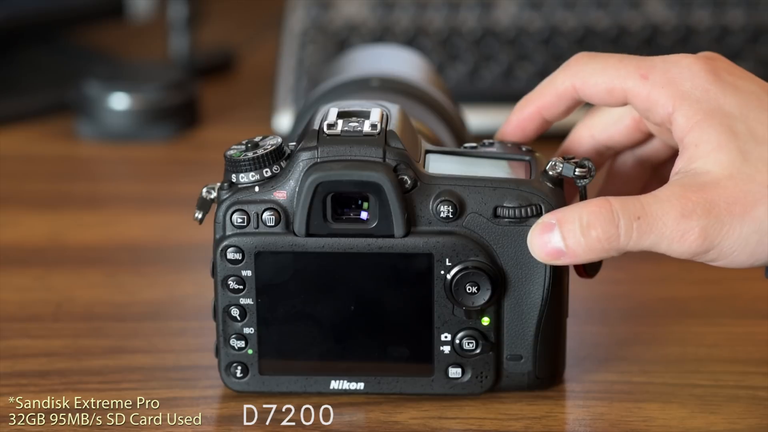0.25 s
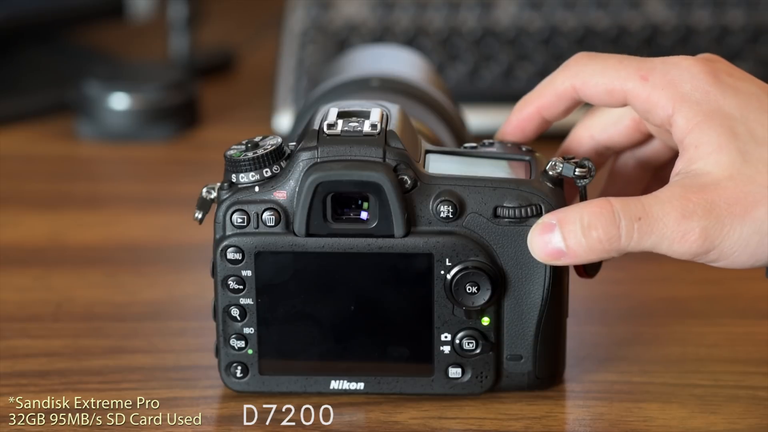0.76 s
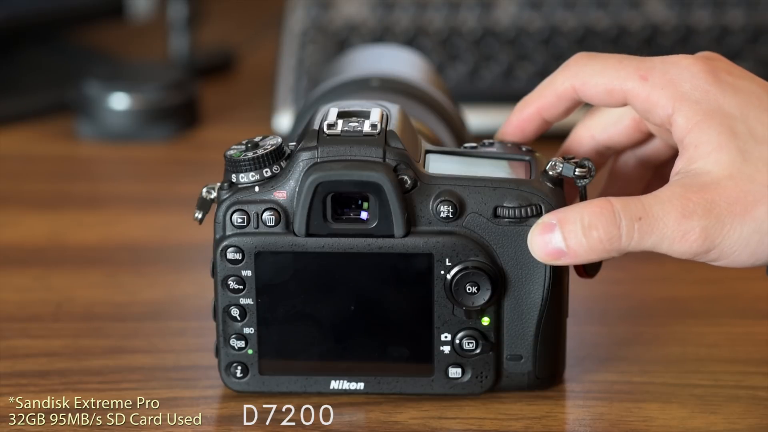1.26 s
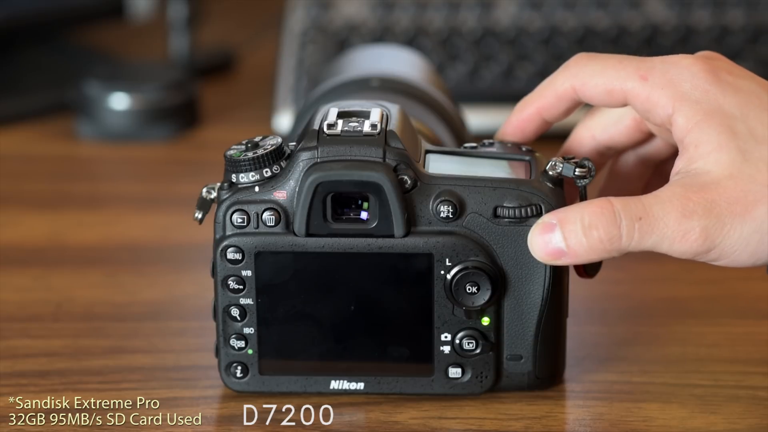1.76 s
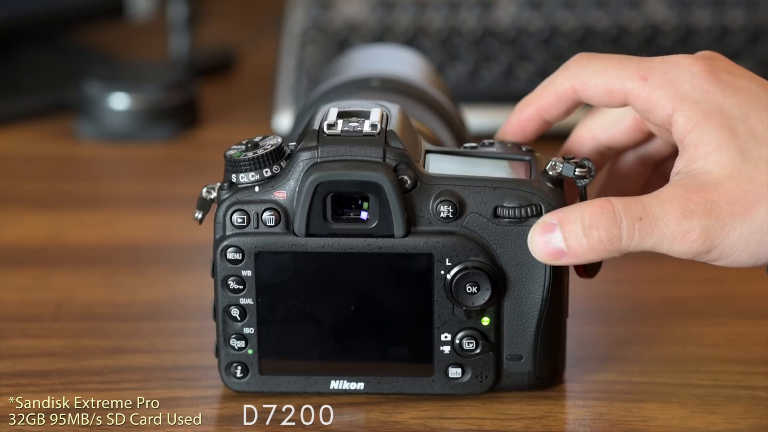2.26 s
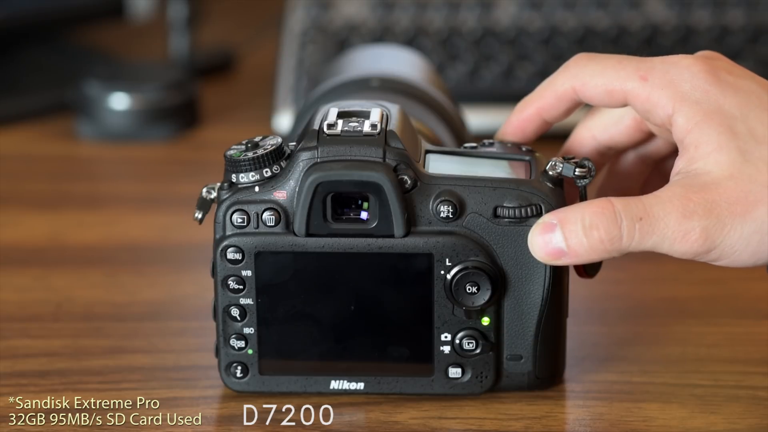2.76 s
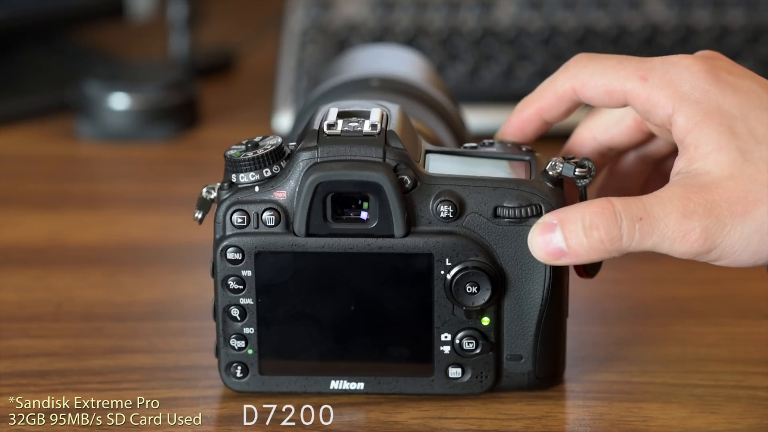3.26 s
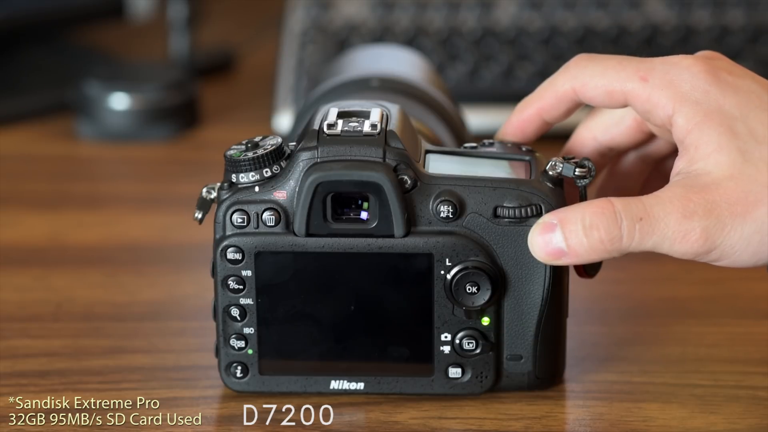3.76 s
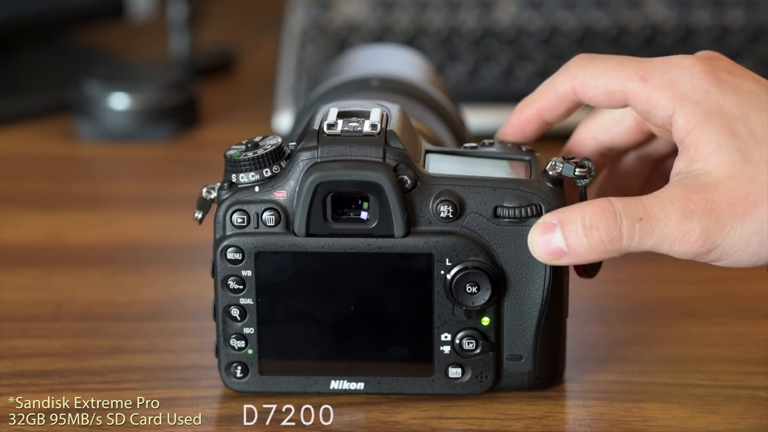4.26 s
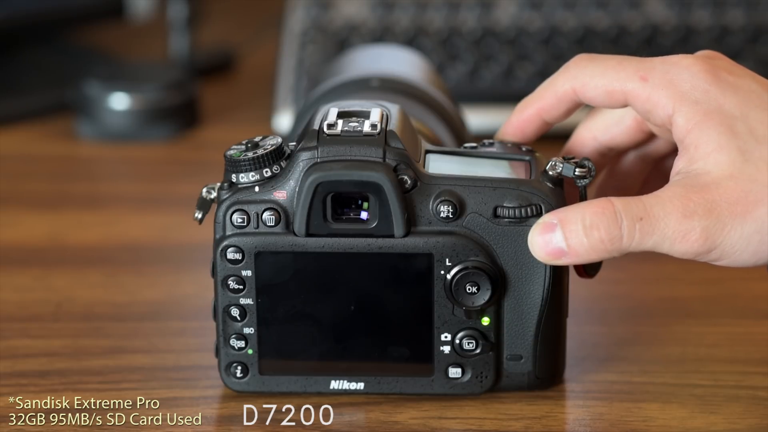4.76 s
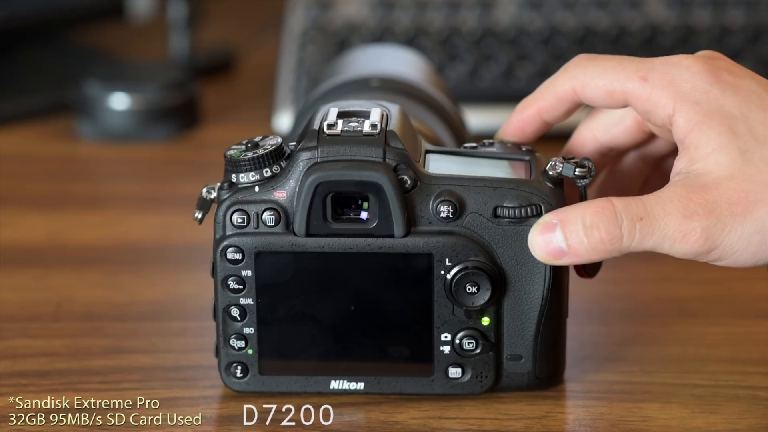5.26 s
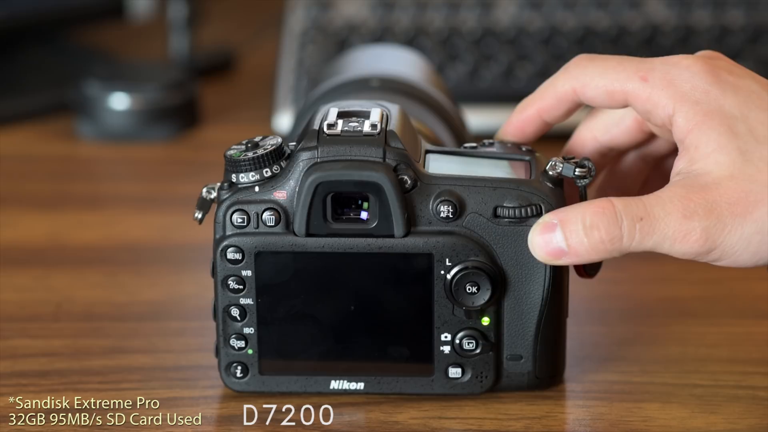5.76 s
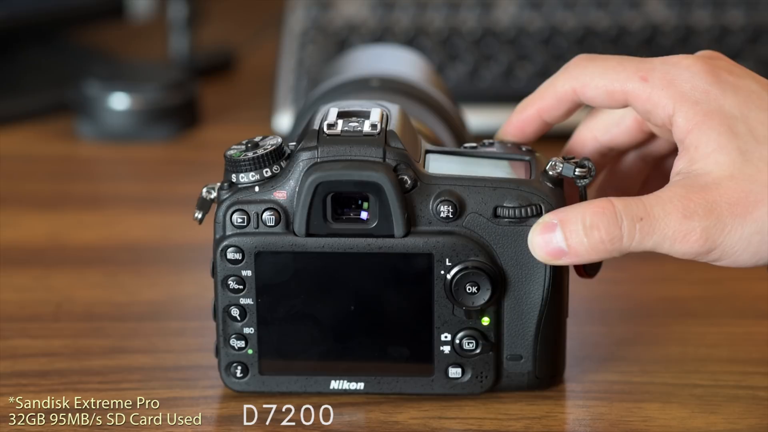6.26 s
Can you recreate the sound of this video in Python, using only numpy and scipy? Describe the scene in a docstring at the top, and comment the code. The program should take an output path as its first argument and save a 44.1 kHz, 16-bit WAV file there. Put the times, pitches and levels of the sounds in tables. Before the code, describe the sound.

A camera shutter fires a rapid, even burst of crisp clicks, then slows and stumbles, close up in a quiet room.

```python
"""A small quiet room, a reflex camera on a wooden desk, the microphone close by.
The camera is already shooting six frames a second, then stumbles as its buffer fills. Every frame is
one chain of clicks and whirrs: release, aperture lever, mirror up, shutter curtains, cocking gears,
mirror down, latch. The blows thump the desk and leave springs ringing; the room answers briefly."""
import sys
import numpy as np
from scipy import signal
from scipy.fft import rfft, irfft, next_fast_len
from scipy.io import wavfile
from scipy.ndimage import uniform_filter1d

SR = 44100
rng = np.random.default_rng(int(sys.argv[2]) if len(sys.argv) > 2 else 0)


def dump(signal):
    """Clip the signal to [-1, 1] and save it as 16-bit WAV at the path in sys.argv[1]."""
    limited = np.clip(np.atleast_2d(signal).T, -1, 1)
    pcm = np.round(limited * 32767).astype(np.int16)
    wavfile.write(sys.argv[1], SR, pcm)


N = 286650

# room tone spectrum: f/Hz, relative level/dB
ROOM_TONE = [(25, 13.5), (50, 7.5), (70, 4), (110, 10.5), (200, 12), (400, -4.5), (1000, -13.5),
             (4000, -28.5), (16000, -41)]
# reverberation time: f/Hz, t60/s
ROOM_T60 = [(150, 0.63), (600, 0.13), (2000, 0.15), (5000, 0.16), (10000, 0.135), (16000, .15)]
# reverberation against the direct sound at the microphone: f/Hz, level/dB
REVERB_LEVELS = [(150, -17), (600, -8), (1400, -12), (3000, -17), (6000, -20), (14000, -20)]
# microphone bass roll-off: f/Hz, level/dB
MIC_LOW_CUT = [(50, -28.5), (62, -28.5), (79, -18), (100, -5), (130, 0)]
# lingering rings of the desk top and the room: f/Hz, level/dB, t60/s
DESK_MODES = [(94, -43.5, 0.4), (128, -54, 0.4), (163.2, -52, 1), (221.4, -55, 0.7), (305, -50.5, 0.17),
              (345, -68.5, 0.28)]
# blows reaching the desk: t/s in the frame, level/dB, f/Hz, swell/s, share of the curtain level added
DESK_THUMPS = [(.017, -37.5, 178, 0.0043, 0), (0.0306, -31.3, 266, 0.0034, 0.12),
               (0.034, -36, 148, 0.0046, 0.07), (.0515, -28, 230, 0.0033, .85),
               (0.0518, -33, 140, 0.0075, 0.6), (.066, -34.3, 220, 0.0032, 0.08),
               (.083, -31, 200, 0.0028, 0.1), (.0945, -38, 175, 0.0036, 0),
               (.11, -44.5, 159.6, 0.0044, 0.03)]
# ringing springs: f/Hz, level/dB, t60/s
SPRING_MODES = [(1830, -72, .35), (1880, -76.5, 0.29), (2148, -65, 0.6), (2080, -60, .12), (2907, -76, .35),
                (4344, -81.5, .4)]
# resonances of each moving part: f/Hz, width/Hz, relative level/dB
RELEASE_MODES = [(403, 150.0, -54), (845, 130, -7), (1060, 230, -7.5), (1980, 210, -18), (2306, 50, 6),
                 (2930, 450, 1.5), (3002, 5800, -12.5), (3940, 67, 0), (6300, 2700, -7), (8800, 410, -9)]
LEVER_MODES = [(403, 150.0, -28), (574, 99, -14), (920, 280, -10.5), (1420, 180, -6), (1890, 55, -2),
               (3000, 4000, -9), (2970, 480, -4.5), (3495, 270, -0.5), (6270, 2300, -14), (9640, 570, -15)]
MIRROR_UP_MODES = [(640, 290.0, -17), (1170, 243, -8), (1330, 130, -4), (1360, 450, -20),
                   (1769, 950, -13.5), (1956, 160, -10.5), (2880, 1100, -13), (3320, 570, -1.5),
                   (3714, 430, -0.5), (4870, 99, -6), (5800, 4100, -15.5), (5888, 220.0, -10),
                   (10400, 1500, -23.5)]
CURTAIN_MODES = [(460, 440, -15.5), (905, 120, -5), (1330, 320, -1), (1730, 230, -2.5), (2080, 270, -5),
                 (2276, 150.0, -23.5), (2610, 200, -5), (3170, 380, -4), (3885, 160, -12.5),
                 (4410, 260, -5), (5050, 380, -2.5), (5420, 310, -5.5), (6000, 660, -16), (6540, 930, -8),
                 (8800, 2900.0, -12.5), (13926, 3100, -23.5)]
GEAR_MODES = [(500, 120, -18), (595, 130, -14.5), (760, 150.0, -17), (885, 150, -10.5),
              (1190, 310.0, -10.5), (1467, 93, -3), (1913, 480, -2.7), (2728, 4400, -10), (3520, 2200, -3),
              (5721, 2500, -12)]
MIRROR_DOWN_MODES = [(440, 470, -18.5), (840, 260, -4.5), (1290, 520, -6.5), (1670, 110, -8),
                     (2070, 450, -10.5), (2218, 130, 0.5), (2957, 540, -0.5), (3480, 86, -4.5),
                     (3830, 1600, -7.5), (4424, 4950, -11), (6720, 1500, -9), (9071, 460.0, -24.5),
                     (10570, 2700, -17.5)]
LATCH_MODES = [(503, 820.0, -17), (940, 150.0, -26), (1043, 120, 0), (1168, 110, -3), (1455, 350, -2),
               (1980, 380, -3), (3400, 1400, -5), (3730, 63, -13.5), (4940, 4400, -15),
               (7439, 880.0, -19.5)]
# contacts and rebounds: t/s from the frame's start, level/dB, decay/s
RELEASE_HITS = [(-.002, -46.5, 0.0033), (.0005, -26.5, 0.0006), (.0016, -32, 0.0011), (.0035, -41, 0.0033)]
LEVER_HITS = [(.0067, -29, .0011), (.0084, -29.5, .0012), (0.0108, -35, .0015)]
CURTAIN_HITS = [(0.0502, -22, .0007), (.0511, -19.3, 0.0009), (0.0527, -23, 0.001), (0.0538, -28.5, 0.0009)]
GEAR_HITS = [(0.046, -40, 0.0025), (0.0607, -35.5, 0.0012), (0.0631, -35.5, .001), (0.0713, -28.5, .0008),
             (0.0821, -34.5, 0.0009)]
# contacts and rebounds: t/s from the mirror's landing, level/dB, decay/s
MIRROR_UP_HITS = [(-.0025, -28, 0.0023), (-.0006, -22, .0014), (.0006, -20.7, .0017)]
MIRROR_DOWN_HITS = [(0, -23, 0.0009), (.0026, -23.5, .0011), (.0038, -23.5, .0017), (.0062, -35, 0.0022)]
LATCH_HITS = [(0.0142, -31.5, 0.0016), (0.0162, -32, 0.003)]
# rubbing strokes in a frame: start t/s, attack/s, level/dB, slope/(dB/s), end t/s, decay/s
LEVER_SLIDE = (0.003, 0.002, -37, -170, 0.043, 0.003)
GEAR_WHIRR = (0.052, 0.003, -37.5, 75, 0.084, 0.007)
# uneven frames once the buffer is full: t/s
LATE_STARTS = [4.7483, 4.9591, 5.2631, 5.4727, 5.6833, 5.9871, 6.2904, 6.4506]
# the curtain slams on about every third frame: frame number from 0
SLAM_FRAMES = [2, 7, 8, 10, 13, 16, 19, 21, 24, 26, 30, 33, 36]
# the mirror catches the springs squarely: frame number from 0
SINGING_FRAMES = [2, 20, 21, 22, 25, 26, 28, 29, 34]

LEAD = SR // 2  # samples ahead of time zero, where the burst begins
FRAME_T = np.arange(-512, 5632) / SR  # t/s around one frame


def gain_of(db):
    """Decibels to amplitude."""
    return 10 ** (np.asarray(db) / 20)


def unit_rms(x):
    """Scales to an rms of one."""
    return x / np.sqrt(np.mean(abs(x) ** 2) + 1e-20)


def curve_at(points, hz):
    """Reads a table along a log-frequency axis."""
    f, value = np.transpose(points)
    return np.interp(np.log(hz + 1), np.log(f), value)


def add(mix, s, sound):
    """Mixes a sound in at time s; the mix begins LEAD samples early."""
    span = mix[LEAD + round(s * SR):][:len(sound)]
    span += sound[:len(span)]


def frame_levels(chosen, chosen_db, usual_db, spread_db):
    """One level for the chosen frames, another for the rest, both a little uneven."""
    return np.where(chosen, chosen_db, usual_db) + spread_db * rng.standard_normal(len(chosen))


def resonate(force, modes, size=4096):
    """A part colours the force on it: broad minimum-phase resonances with unit power gain."""
    f = np.maximum(abs(np.fft.fftfreq(size, 1 / SR)), 1)
    power = sum(gain_of(db) ** 2 / (1 + ((f * f - hz * hz) / (f * width)) ** 2) ** 2
                for hz, width, db in modes)
    log_gain = np.log(np.maximum(unit_rms(np.sqrt(power)), 1e-5))
    response = np.fft.ifft(np.exp(np.conj(signal.hilbert(log_gain)))).real
    return signal.oaconvolve(force, response[:size // 2])[:len(force)]


def ring(blows, modes):
    """Each blow sets off decaying sines."""
    t = np.arange(SR) / SR
    tone = sum(gain_of(db) * 1000 ** (-t / t60) * np.sin(2 * np.pi * hz * t) for hz, db, t60 in modes)
    return signal.oaconvolve(blows, tone)[:len(blows)]


def chatter(envelope, passes=10):
    """Random micro-impacts under an envelope, evenly spread over all frequencies."""
    grains = rng.standard_normal(len(envelope))
    for _ in range(passes):
        white = irfft(np.exp(1j * np.angle(rfft(grains * envelope))))
        grains = white / np.sqrt(abs(uniform_filter1d(white ** 2, size=40)) + 1e-20)
    return grains * envelope


def strike(times, hits, modes, fresh, levels_db=0, rise_s=0.0003):
    """A part hits and rebounds alike in every frame, but for a fresh share of its chatter's power."""
    power = 0
    for s, db, decay in hits:
        age = np.maximum(FRAME_T - s + rise_s, 0)
        power += (gain_of(db) * np.minimum(age / rise_s, np.exp((rise_s - age) / decay))) ** 2
    envelope = np.sqrt(power)
    repeated = np.sqrt(1 - fresh) * chatter(envelope)
    force = np.zeros(LEAD + N)
    for s, db in zip(times, np.broadcast_to(levels_db, len(times))):
        varying = np.sqrt(fresh) * envelope * rng.standard_normal(len(envelope))
        add(force, s + FRAME_T[0], gain_of(db) * (repeated + varying))
    return resonate(force, modes)


def rub(times, stroke, modes, grain_db):
    """Teeth and sliding faces give a grainy rush: attack, sloping hold, decay."""
    begin, attack, db, slope, end, decay = stroke
    envelope = np.clip((FRAME_T - begin) / attack, 0, 1) * gain_of(db + slope * (FRAME_T - begin))
    envelope *= np.exp(-np.maximum(FRAME_T - end, 0) / decay)
    force = np.zeros(LEAD + N)
    for s in times:
        hiss, lumps = rng.standard_normal((2, len(FRAME_T)))
        roughness = gain_of(grain_db * unit_rms(uniform_filter1d(lumps, size=30)))
        add(force, s + FRAME_T[0], envelope * unit_rms(hiss * roughness))
    return resonate(force, modes)


def room_tone(level_db=-58.5):
    """The faint rumble and hiss behind everything."""
    colour = gain_of(curve_at(ROOM_TONE, np.fft.rfftfreq(N, 1 / SR)))
    return gain_of(level_db) * unit_rms(irfft(rfft(rng.standard_normal(N)) * colour, N))


def room_reverb(direct, onset_s=0.0042):
    """Near walls return a quickly building diffuse tail whose bass lingers longest."""
    hz, t, noise = signal.stft(rng.standard_normal(SR), SR, nperseg=256)
    fade = 1000 ** (-t / curve_at(ROOM_T60, hz)[:, None]) * np.minimum(t / onset_s, 1) ** 2
    energy = SR * np.mean(fade ** 2, axis=1, keepdims=True)
    fade *= gain_of(curve_at(REVERB_LEVELS, hz))[:, None] / np.sqrt(energy)
    response = signal.istft(noise * fade, SR)[1]
    return signal.oaconvolve(direct, response)[:len(direct)]


def desk(starts, ups, downs, curtain_levels, jitter_s=0.00026, return_db=-7):
    """Recoil rocks the camera on the desk in dead knocks; both mirror stops leave the top ringing."""
    t = np.arange(SR // 20) / SR
    knocks, blows = np.zeros((2, LEAD + N))
    for start, up, down, curtain_db in zip(starts, ups, downs, curtain_levels):
        add(blows, up, np.ones(1))
        add(blows, down, gain_of([return_db]))
        for s, db, hz, swell, share in DESK_THUMPS:
            knock = (t / swell * np.exp(1 - t / swell)) ** 2 * np.sin(2 * np.pi * hz * t)
            onset = start + s + jitter_s * rng.standard_normal()
            add(knocks, onset, gain_of(db + share * curtain_db) * knock)
    return knocks + ring(blows, DESK_MODES)


def springs(downs):
    """The returning mirror plucks the springs, sometimes hard enough to make them sing."""
    singing = np.isin(np.arange(len(downs)), SINGING_FRAMES)
    plucks = np.zeros(LEAD + N)
    for s, db in zip(downs, frame_levels(singing, chosen_db=6, usual_db=-3, spread_db=2.5)):
        add(plucks, s, gain_of([db]))
    return ring(plucks, SPRING_MODES)


def lever_stir(starts, ahead_s=0.044, level_db=-50, decay_s=0.025):
    """The lever rustles softly just ahead of a delayed frame."""
    t = np.arange(SR // 15) / SR
    force = np.zeros(LEAD + N)
    for s in starts:
        add(force, s - ahead_s, gain_of(level_db) * np.exp(-t / decay_s) * rng.standard_normal(len(t)))
    return resonate(force, LEVER_MODES)


def release(starts, delayed):
    """The release clicks as the frame opens, muted after a long wait."""
    levels = frame_levels(delayed, chosen_db=-17, usual_db=1.2, spread_db=0.8)
    return strike(starts, RELEASE_HITS, RELEASE_MODES, fresh=0.33, levels_db=levels)


def aperture_lever(starts):
    """The lever ticks and slides with a fading scrape."""
    ticks = strike(starts, LEVER_HITS, LEVER_MODES, fresh=0.45)
    return ticks + rub(starts, LEVER_SLIDE, LEVER_MODES, grain_db=2)


def cocking_gears(starts):
    """Gear teeth click and whirr as they cock the shutter again."""
    clicks = strike(starts, GEAR_HITS, GEAR_MODES, fresh=0.76)
    return clicks + rub(starts, GEAR_WHIRR, GEAR_MODES, grain_db=0.5)


def mirror_up(ups):
    """The mirror slaps its upper stop."""
    return strike(ups, MIRROR_UP_HITS, MIRROR_UP_MODES, fresh=0.15)


def mirror_down(downs):
    """The mirror drops back and bounces, then the latch catches."""
    landing = strike(downs, MIRROR_DOWN_HITS, MIRROR_DOWN_MODES, fresh=0.25)
    return landing + strike(downs, LATCH_HITS, LATCH_MODES, fresh=0.09)


def shutter_curtains(starts, levels):
    """The curtains end their travel with a bright snap."""
    return strike(starts, CURTAIN_HITS, CURTAIN_MODES, fresh=0.068, levels_db=levels)


def burst(first_s=-0.1343, period_s=0.16352, count=29, up_s=0.0298, down_s=0.0854, jitter_s=0.0004):
    """Frame starts, steady and then stumbling, and the moments the mirror lands up and down."""
    starts = np.concatenate([first_s + period_s * np.arange(count), LATE_STARTS])
    up_slip, down_slip = jitter_s * rng.standard_normal((len(starts), 2)).T
    return starts, starts + up_s + up_slip, starts + down_s + down_slip


def scene():
    """At the microphone, in mono: camera and desk up close, the room behind them."""
    starts, ups, downs = burst()
    delayed = np.diff(starts, prepend=starts[0]) > 0.25  # frames after a long wait
    slams = np.isin(np.arange(len(starts)), SLAM_FRAMES)
    curtain_levels = frame_levels(slams, chosen_db=-0.8, usual_db=-9.3, spread_db=0.7)
    camera = (release(starts, delayed) + aperture_lever(starts) + mirror_up(ups)
              + shutter_curtains(starts, curtain_levels) + cocking_gears(starts) + mirror_down(downs)
              + lever_stir(starts[delayed]) + springs(downs))
    direct = camera + desk(starts, ups, downs, curtain_levels)
    return ((direct + room_reverb(direct))[LEAD:] + room_tone())[None]


def record(dry, ceiling_db=-9.5, edge_hz=16100):
    """The microphone drops the deep bass and rounds the tallest peaks; then a steep band limit."""
    size = next_fast_len(N + SR, True)
    low_cut = gain_of(curve_at(MIC_LOW_CUT, np.fft.rfftfreq(size, 1 / SR)))
    thinned = irfft(rfft(dry, size) * low_cut, size)[:, :N]
    rounded = gain_of(ceiling_db) * np.tanh(thinned / gain_of(ceiling_db))
    low_pass = signal.firwin(511, edge_hz, window=("kaiser", 9), fs=SR)
    return signal.oaconvolve(rounded, low_pass[None], "same")


dry = scene()
out = record(dry)
dump(out)
```